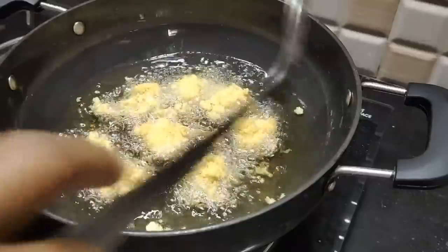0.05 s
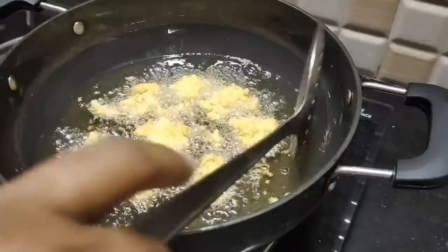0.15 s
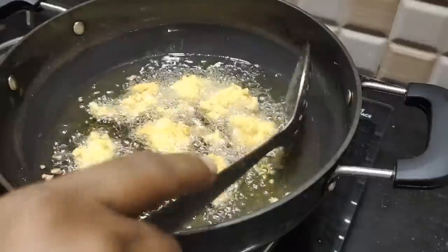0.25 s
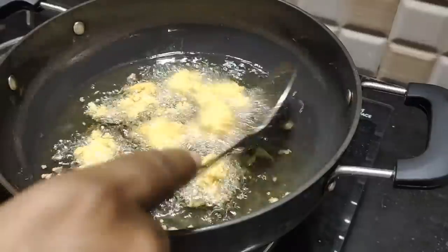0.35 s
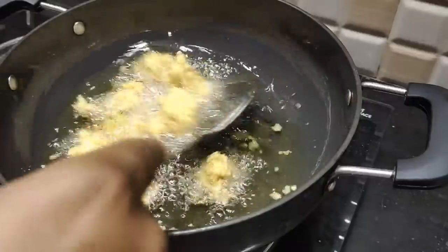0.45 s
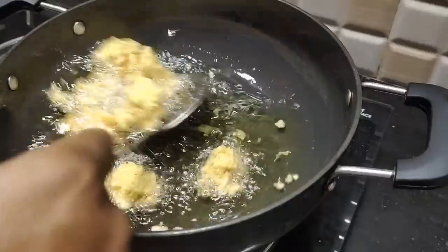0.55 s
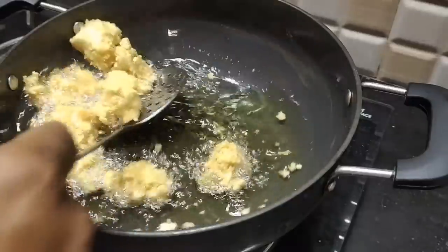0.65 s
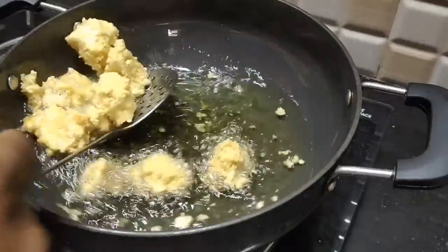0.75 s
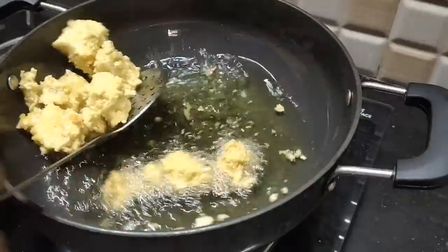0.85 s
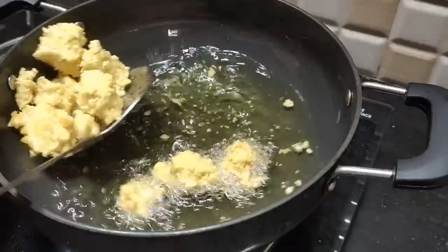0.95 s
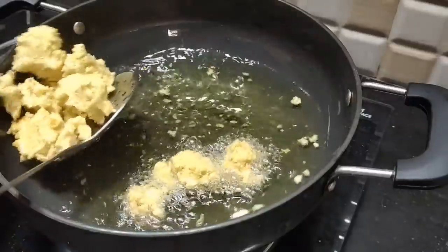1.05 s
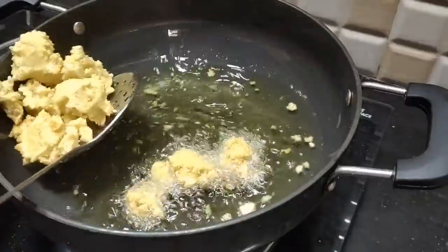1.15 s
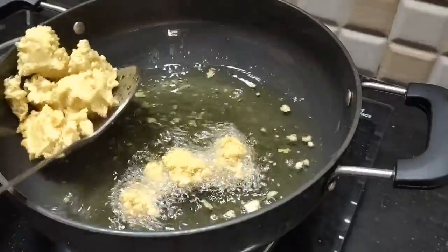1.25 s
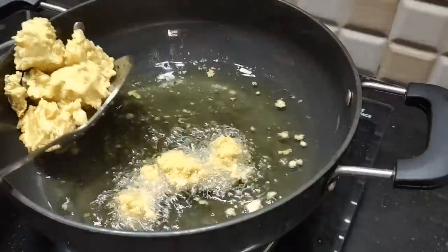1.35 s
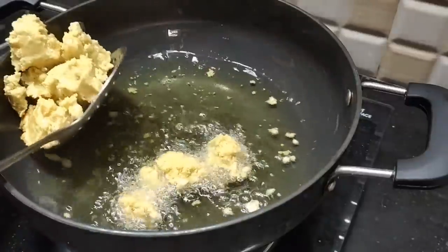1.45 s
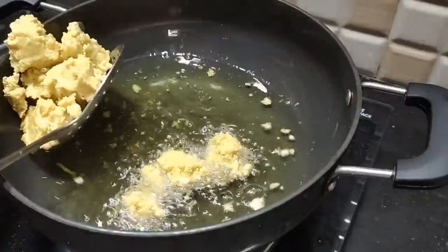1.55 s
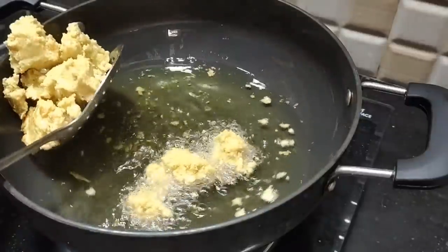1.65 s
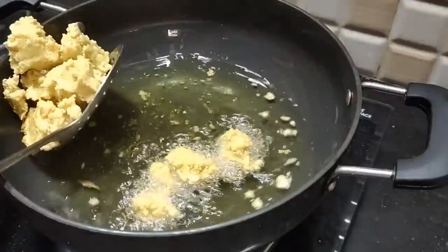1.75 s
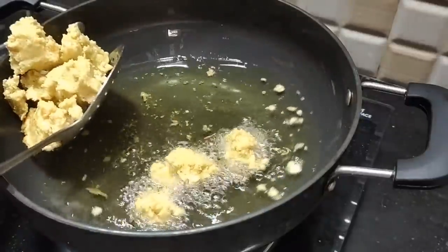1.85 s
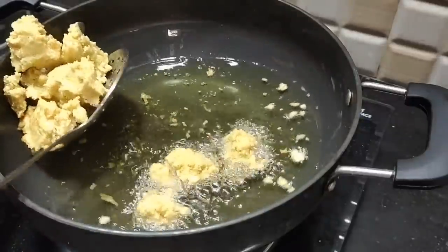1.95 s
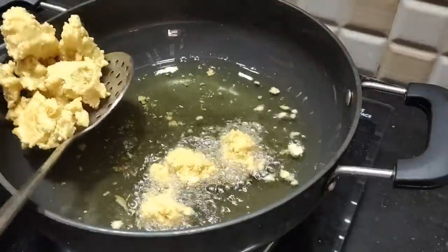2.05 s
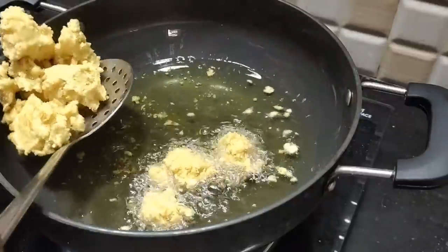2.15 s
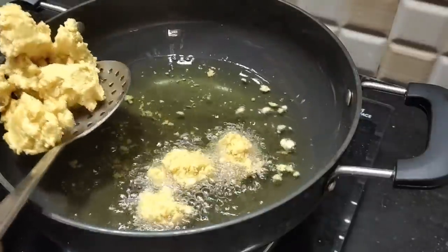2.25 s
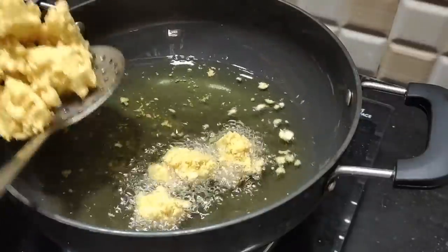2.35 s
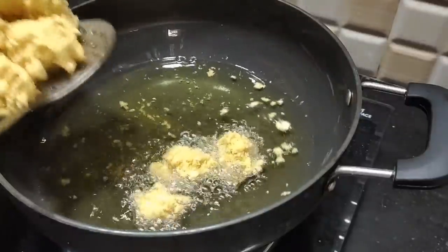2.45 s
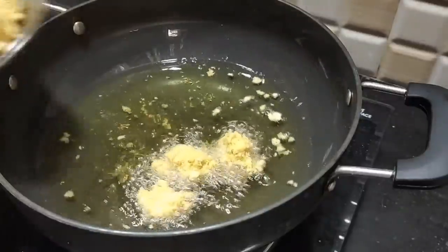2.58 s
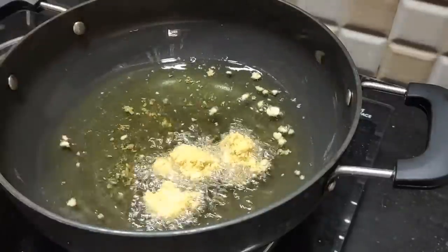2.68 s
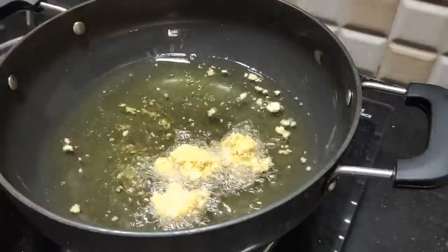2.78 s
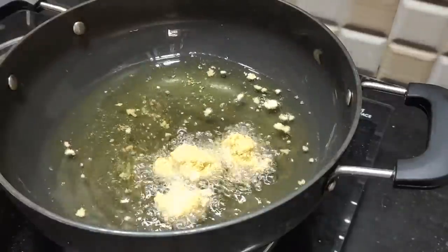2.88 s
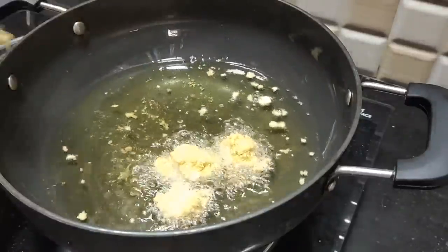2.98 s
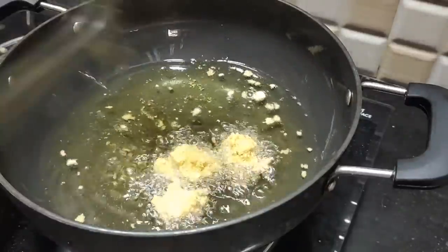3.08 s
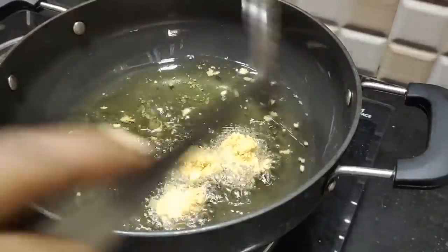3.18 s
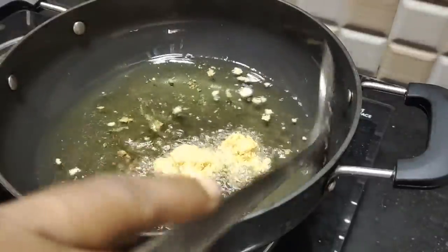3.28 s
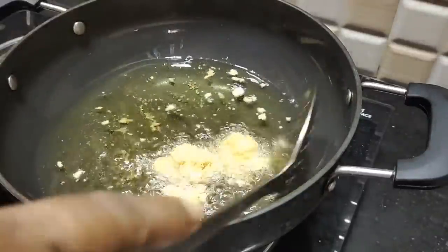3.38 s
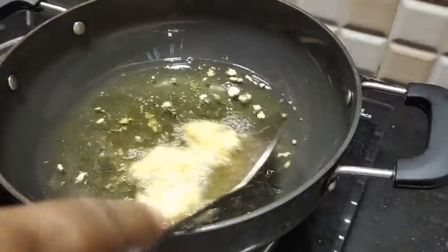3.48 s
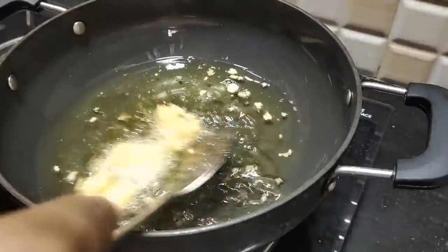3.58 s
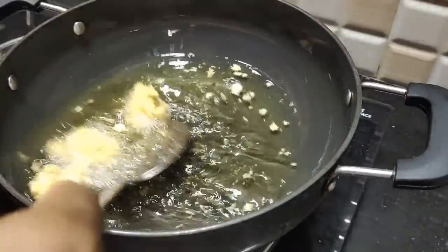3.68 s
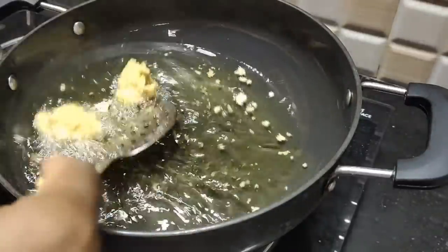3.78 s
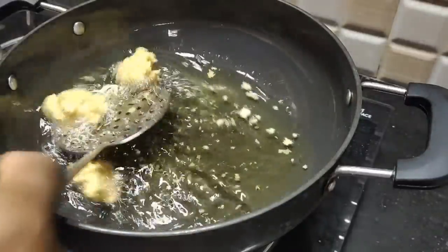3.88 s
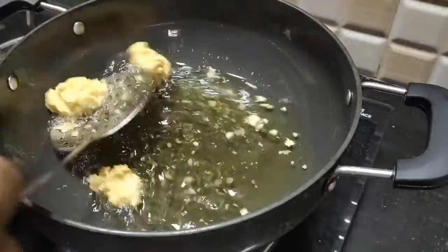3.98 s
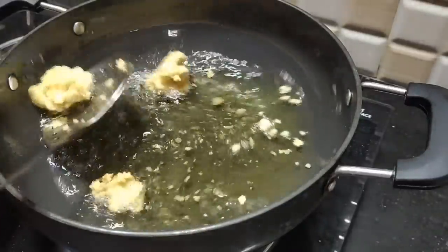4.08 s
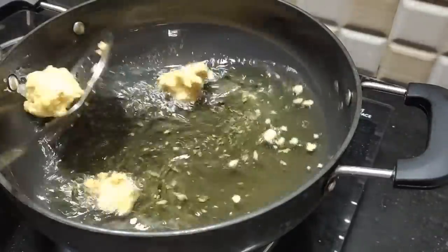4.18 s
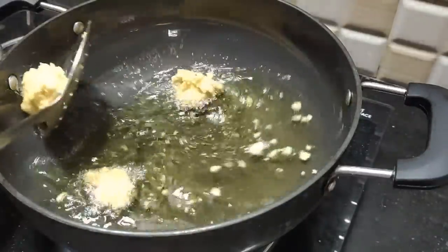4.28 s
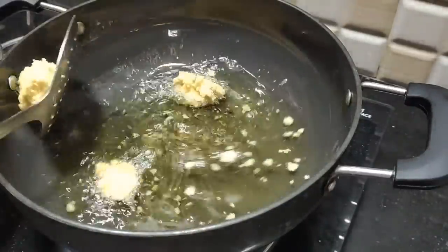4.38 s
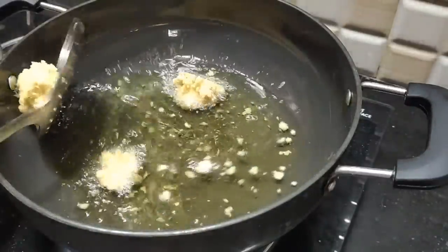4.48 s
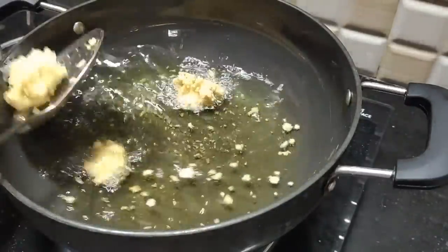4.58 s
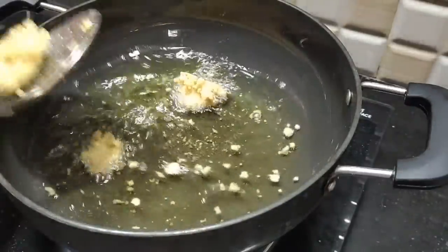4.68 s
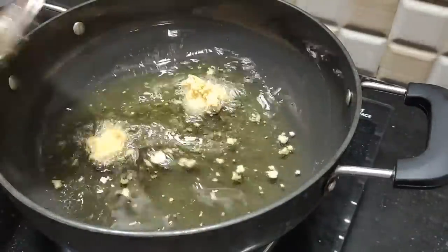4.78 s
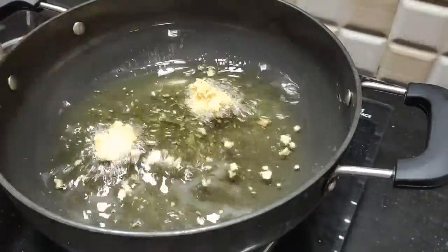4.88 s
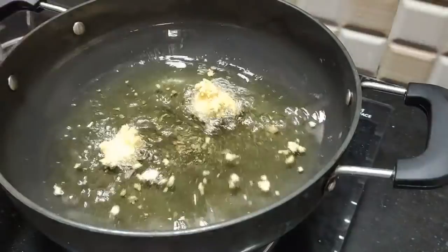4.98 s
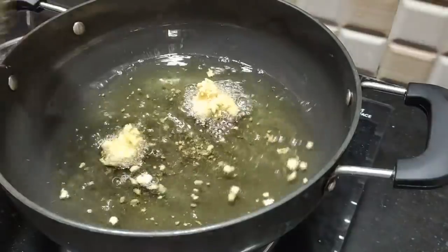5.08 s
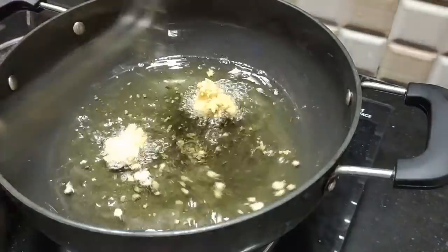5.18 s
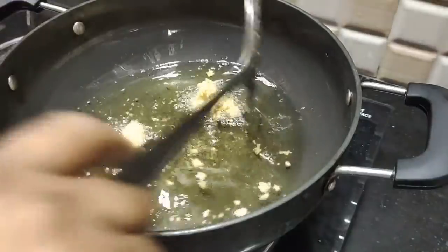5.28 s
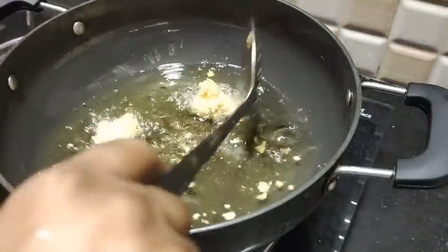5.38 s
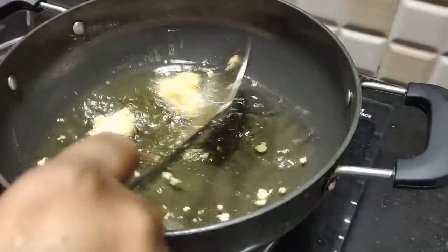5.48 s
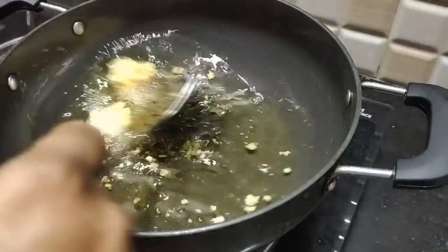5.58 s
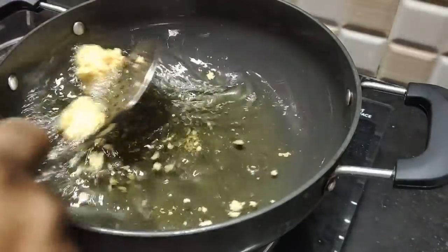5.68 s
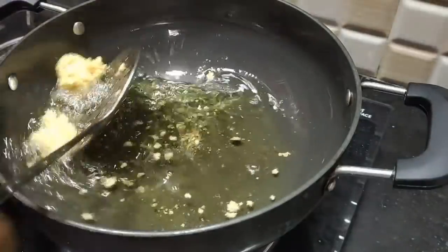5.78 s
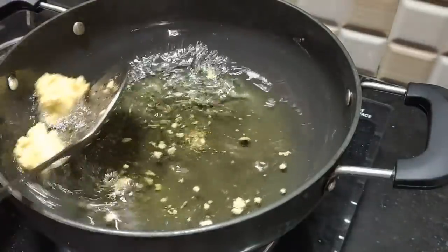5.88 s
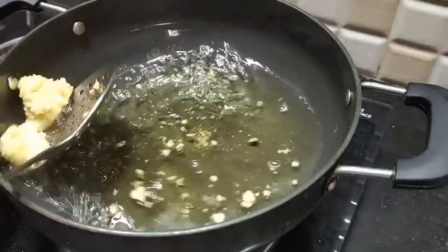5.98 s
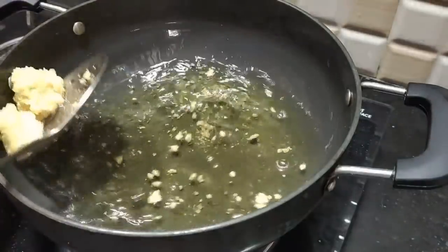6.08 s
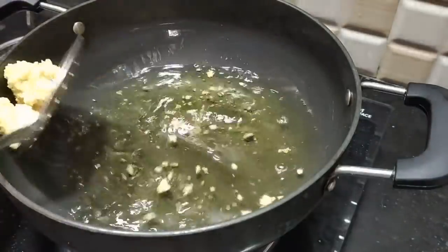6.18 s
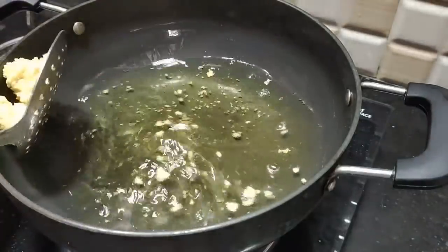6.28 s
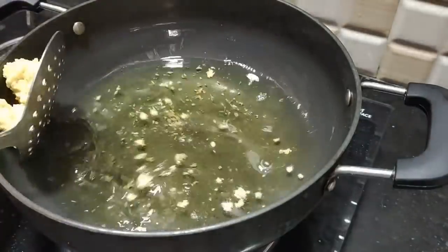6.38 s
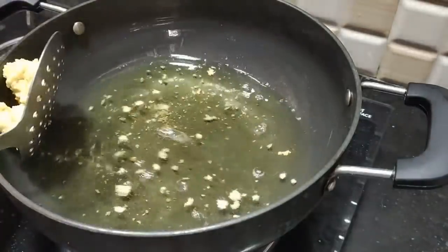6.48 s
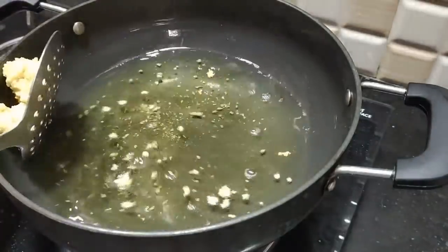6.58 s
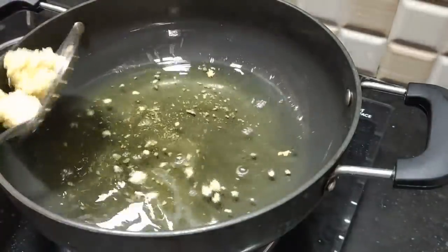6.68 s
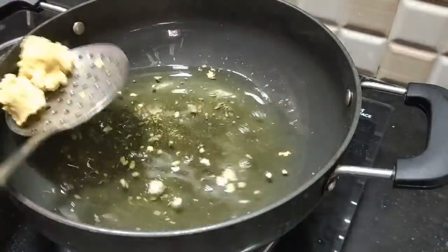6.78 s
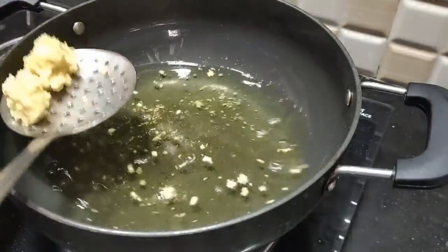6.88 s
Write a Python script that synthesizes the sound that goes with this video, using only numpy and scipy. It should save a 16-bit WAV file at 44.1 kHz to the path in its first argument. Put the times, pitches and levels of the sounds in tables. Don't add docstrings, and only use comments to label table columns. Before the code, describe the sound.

Intermittent metal spoon knocks and scrapes in an oil-filled pan, sharp clanks at a few moments, soft low thuds between, frying reduced to a faint hiss.

```python
import sys
import numpy as np
from scipy import signal
from scipy.fft import rfft, irfft
from scipy.io import wavfile
from scipy.ndimage import uniform_filter1d, minimum_filter1d

SR = 44100
rng = np.random.default_rng(int(sys.argv[2]) if len(sys.argv) > 2 else 0)


def boost_factor(decibels):
    exponent = np.asarray(decibels, float) / 20
    return 10 ** exponent


def to_wav(sig):
    pcm = np.clip(np.atleast_2d(sig), -1, 1) * 32767
    pcm = np.round(pcm).astype(np.int16)
    wavfile.write(sys.argv[1], SR, pcm.T)


N = 306054

# pitch in Hz, level in dB, time to fall 60 dB in s.
SPOON_TONES = [(3316, -22, .3), (3735, -13, .25), (4440, -21, .25), (5087, -9, .4), (6290, -24, .2),
               (6800, -17, .2), (7160, -4, .3), (7600, -11, .2), (7806, -16, .3), (8400, -11, .2),
               (8920, -14, .2), (10030, -13, .35), (10660, -14, .27), (12900, -15, .17)]
# pitch in Hz, level in dB, time to fall 60 dB in s.
WALL_TONES = [(667, -21, 5.0), (875, -16, 0.34), (1156, -14.5, 0.23), (1532, -21.5, 0.43),
              (1828, -13.5, 0.76), (2080, -48.5, 0.36), (2373, -60, 5.0), (2289, -18.5, 0.38),
              (2375, -26.5, 0.22), (2520, -21, 0.4), (2846, -9, 0.033), (3140, -31, 0.019)]
# pitch in Hz, level in dB, time to fall 60 dB in s.
RIM_TONES = [(1870, 16.5, 0.23), (2042, 0.5, 0.23), (2414, 7.5, 0.16), (2650, 3.5, 0.26)]
# pitch in Hz, level in dB, time to fall 60 dB in s.
BOWL_TONES = [(261, -6, 0.25), (273.2, -5.5, 0.38), (289.5, -1, 0.29), (320, 11, 0.23), (334, 4, 0.22),
              (515, -0.5, 0.11)]
# frequency in Hz, level in dB per Hz.
CRACK_COLOUR = [(180, -53), (300, -13.5), (737, -3.5), (1040, -10.5), (1930, -7.5), (3700, -14.5),
                (3950, -14.5), (7320, -6.5), (13100, -12), (16000, -30)]
# start in s, peak in dB, favoured pitch in Hz, push length in s.
PUSHES = [(0.045, -12.5, 299, 0.013), (0.056, -7.5, 273, 0.017), (0.109, -23, 275.6, 0.05),
          (0.234, -33, 300, 0.011), (0.589, -25.5, 320, 0.0076), (0.619, -22, 284, 0.021),
          (0.642, -19.5, 253, 0.035), (0.776, -38, 270, 0.037), (1.358, -49, 310, 0.014),
          (2.084, -41.5, 358, 0.035), (2.68, -28, 288, 0.056), (2.755, -33, 315, 0.0052),
          (2.809, -27, 288, 0.0054), (3.246, -28.5, 339, 0.029), (3.472, -31, 311, 0.054),
          (3.535, -27.5, 277.5, 0.019), (4.045, -42.5, 270, 0.034), (4.258, -24, 271, 0.021),
          (4.411, -42, 287.5, 0.051), (4.544, -26, 277, 0.026), (4.57, -22.5, 338, 0.021),
          (4.652, -34, 277, 0.025), (4.833, -32, 281.6, 0.035), (4.987, -36.5, 374, 0.008),
          (5.092, -42.5, 310, 0.0065), (5.171, -25.5, 274, 0.029), (5.225, -19, 280, 0.044),
          (5.656, -24.5, 267.5, 0.036), (5.765, -30.5, 266, 0.024), (5.877, -26.5, 272.6, 0.024),
          (5.914, -44.5, 274, 0.014), (6.244, -33, 289.3, 0.039), (6.697, -43.5, 320, 0.076)]


def evened(x):
    return x / np.sqrt(np.mean(x ** 2) + 1e-20)


def read(points, hz):
    f, value = np.transpose(points)
    return np.interp(np.log(hz + 1), np.log(f + 1), value)


def add(mix, s, sound):
    part = mix[..., round(s * SR):][..., :sound.shape[-1]]
    part += sound[..., :part.shape[-1]]


def coloured(x, spectrum):
    hz = np.fft.rfftfreq(x.shape[-1], 1 / SR)
    return evened(irfft(rfft(x) * boost_factor(read(spectrum, hz)), x.shape[-1]))


def sides(pan_db):
    return boost_factor(np.array([.5 * pan_db, -.5 * pan_db]))


def place(s):
    # time in s, left minus right in dB.
    path = [(0, 3.5), (1.1, 8.5), (1.6, 5), (2.5, 5), (3.6, 4), (4.2, 2), (4.55, 8), (4.62, 8), (4.7, 5),
            (5.2, 3), (6.94, 5.5)]
    return sides(np.interp(s, *np.transpose(path)))


def rings(modes, longest, length=.5):
    hz, db, t60 = np.transpose(modes)[:, :, None]
    t = np.arange(round(length * SR)) / SR
    return boost_factor(db - 60 * t / np.clip(t60, .02, longest)) * np.sin(2 * np.pi * hz * t)


def struck(ring, draw, spread_db):
    strength = boost_factor(spread_db * draw) * np.sign(draw[::-1, ::-1])
    sound = strength @ ring
    return sound / abs(sound).max()


def noise_burst(t, envelope, treble):
    burst = rng.standard_normal((2, len(t)))
    spot_db = 3.2 * evened(uniform_filter1d(rng.standard_normal(len(t) // 2 + 1), size=70))
    burst = irfft(rfft(burst + 0.13 * burst[::-1]) * boost_factor(spot_db), len(t))
    low = signal.lfilter(*signal.butter(4, 3300, fs=SR), coloured(burst, CRACK_COLOUR) * envelope)
    high = signal.lfilter(*signal.butter(3, 3500, "high", fs=SR), coloured(burst, treble) * envelope)
    return low / abs(low).max(), high / abs(high).max()


def patchy(x, depth_db):
    z = signal.stft(x, SR, nperseg=512)[2]
    patches = uniform_filter1d(rng.standard_normal(z.shape[1:]), size=3, axis=0)
    patches = evened(uniform_filter1d(patches, size=22, axis=1))
    return evened(signal.istft(z * boost_factor(depth_db * patches), SR, nperseg=512)[1][:, :N])


def bowl_only(x):
    return signal.sosfilt(signal.butter(2, 215, "high", fs=SR, output="sos"), x)


def knocks():
    # start in s, peak in dB, wall share in dB,
    # loudest low line in Hz, loudest high line in Hz.
    blows = [(2.0888, -34, 2, 5080, 7240), (2.25, -42.5, 6.5, 2650, 6950), (2.3045, -33, 7, 2160, 7840),
             (2.3898, -38, -2, 1870, 7840), (2.6909, -13.5, -24, 4600, 8750), (2.826, -31, -3, 2880, 7230),
             (2.8568, -31, -25, 2730, 9280), (3.021, -34.5, -2, 2200, 7100), (3.105, -38, 1.5, 1890, 6780),
             (3.2175, -45, -6.5, 3600, 7850), (3.242, -14, -17, 5080, 7154), (3.255, -9, -23, 5087, 7154),
             (4.567, -8, -14, 2011, 6950), (4.575, -11.5, -17.5, 1870, 8366), (4.6338, -6, -11, 1873, 7622),
             (4.652, -22, -5.5, 2650, 8924), (4.9819, -41.5, 5, 4540, 8040),
             (6.7152, -20, -10.5, 5070, 7160), (6.723, -22.5, -5, 1930, 8300),
             (3.127, -36, -12, 2330, 7500)]
    grip_t60_s = 0.091
    wall, spoon = rings(WALL_TONES + RIM_TONES, 0.53), rings(SPOON_TONES, 0.91)
    coated = rings(np.multiply(SPOON_TONES, [.9935, 1, 1]), 0.91)
    out = np.zeros((2, N))
    t = np.arange(wall.shape[1]) / SR
    gaps = abs(np.diff([row[0] for row in blows], append=10))
    for (s, db, wall_db, low_hz, high_hz), gap in zip(blows, gaps):
        draw = rng.standard_normal((2, 60))
        crack_fall = boost_factor(-60 * t / 0.024) + boost_factor(-4.0 - 60 * t / 0.092)
        low, high = noise_burst(t, crack_fall, CRACK_COLOUR)
        choke = 0.66 * boost_factor(-60 * t / grip_t60_s - 3200 * np.maximum(t - gap, 0))
        clank = 1.07 * low + 1.73 * choke * boost_factor(-300 * t) * struck(wall, draw[:, -len(wall):], 7.2)
        high_line = boost_factor(-250 * t) * 0.61 * np.sin(2 * np.pi * high_hz * t)
        low_line = .5 * boost_factor(0.57 * wall_db - 960 * t) * np.sin(2 * np.pi * low_hz * t)
        is_coated = 4.5 < s < 5.5
        ring = struck(coated if is_coated else spoon, draw[:, :len(spoon)], 3.5)
        chink = 0.9 * high + choke * (0.83 * ring + high_line + low_line)
        blow = (boost_factor(wall_db) * clank + chink) * np.minimum(t / 0.0017, 1)
        add(out, s, boost_factor(db + 1.5) * place(s)[:, None] * blow)
    return out


def slaps():
    # start in s, peak in dB, crack fall time (60 dB) in s,
    # rattle level in dB, rattle fall time (60 dB) in s.
    flat_hits = [
        (0.228, -16, 0.053, -9, 0.35),
        (2.691, -14.5, 0.024, -3.5, 0.42),
        (5.3367, -1, 0.012, -7, 0.19),
        (3.243, -21, 0.082, -9.5, 0.3),
        (4.567, -13, 0.055, -8.5, 0.19),
        (4.633, -18, 0.06, -12.5, 0.19),
        (6.714, -25, 0.06, -16, 0.25),
        (2.672, -30, 0.3, -10, 0.2),
    ]
    # frequency in Hz, level in dB per Hz.
    slap_colour = [(240, -21.5), (400, -7), (2060, -9.5), (2320, -1), (3970, -17.5), (7100, -13.5),
                   (11000, -13), (15500, -26.5)]
    t, out = np.arange(SR // 2) / SR, np.zeros((2, N))
    for s, db, crack_t60, rattle_db, rattle_t60 in flat_hits:
        burst = rng.standard_normal((2, len(t)))
        noise = coloured(burst + .5 * burst[::-1], slap_colour)
        crack = boost_factor(-60 * np.maximum(t - .004, 0) / crack_t60)
        rattle = boost_factor(rattle_db - 60 * t / rattle_t60)
        rise = np.minimum(t / 0.0013, 1)
        add(out, s, boost_factor(db - 13.5) * place(s)[:, None] * noise * (crack + rattle) * rise)
    return out


def thumps():
    ring, out = rings(BOWL_TONES, 1.2, length=0.67), np.zeros(N)
    for s, db, hz, length in PUSHES:
        near = boost_factor(-((np.transpose(BOWL_TONES)[0] - hz) / 14) ** 2 + 18.0)
        samples = max(round(length * SR), 8)
        push = np.hanning(samples) * np.sin(2 * np.pi * hz * np.arange(samples) / SR)
        boom = signal.oaconvolve((near + 0.05) @ ring, push)
        add(out, max(s - .006, 0), boost_factor(db - 2.0) * boom / abs(boom).max())
    return out * sides(1.7)[:, None]


def bumps():
    # start in s, peak in dB, treble share in dB, time to fall 60 dB in s.
    dull_hits = [(0.039, -26.5, -8.5, 0.21), (0.056, -30, -3, 0.32), (0.234, -28, -11, 0.094),
                 (0.58, -35, -14, 0.36), (0.618, -27.5, -12.5, 0.15), (0.653, -28, -9.5, 0.071),
                 (0.699, -30, -14, 0.13), (1.338, -38.5, -19.5, 0.12), (1.885, -46.5, -33, 0.17),
                 (1.929, -37.5, -27, 0.06), (2.336, -31.5, -16, 0.11), (2.686, -21.5, -7, 0.27),
                 (2.789, -26, -8.5, 0.3), (3.128, -34, -11, 0.036), (3.309, -34, -9.5, 0.49),
                 (3.462, -22.5, -20.5, 0.45), (3.509, -23, -16, 0.057), (3.59, -32, -8.5, 0.066),
                 (4.042, -46.5, -26, 0.1), (4.213, -40, -21, 0.055), (4.402, -39.5, -40, 0.46),
                 (4.837, -41, -15, 0.2), (5.178, -33.5, -22, 0.16), (5.238, -38.5, -14.5, 0.14),
                 (5.648, -33, -18, 0.53), (5.89, -39.5, -22, 0.086), (6.327, -37.5, -53, 0.051),
                 (6.383, -32, -22.5, 0.48), (6.559, -33, -41, 0.43)]
    # frequency in Hz, level in dB per Hz.
    bump_treble = [(2350, -15.5), (4000, -14), (6000, -13), (7480, -5.5), (10700, -30), (11800, -24),
                   (15500, -37.5), (16000, -52.5)]
    rise_s = .007
    wall, out = rings(WALL_TONES, 0.071, length=0.016), np.zeros((2, N))
    t = np.arange(SR // 2) / SR
    for s, db, treble_db, t60 in dull_hits:
        draw = rng.standard_normal((2, 30))
        swell = (1 - np.exp(-(t / rise_s) ** 2)) * boost_factor(-60 * t / max(t60, .02))
        low, high = noise_burst(t, swell, bump_treble)
        body = struck(wall, draw[:, :len(wall)], 7.6)
        rung = signal.oaconvolve(low, body, axes=1)[:, :len(t)]
        thud = .5 * low + 0.41 * rung / abs(rung).max() + boost_factor(treble_db + 5.5) * high
        add(out, max(s - .5 * rise_s, 0), boost_factor(db + 3.5) * place(s)[:, None] * thud)
    return out


def pressure(layer):
    # start in s, length in s, pressure as wall level in dB,
    # bowl share in dB, fizz share in dB.
    strokes = [(0.051, 0.036, -35.5, 7, -14.5), (0.565, 0.11, -55.5, 8.5, -23), (0.6, 0.14, -58, -13, -2),
               (0.06, 0.08, -60, -13, 11), (0.7, 0.17, -58, -13, -11), (0.938, 0.085, -59.5, 4.5, -10.5),
               (1.896, 0.23, -51, -8, -14), (2.252, 0.044, -50, -5, -6), (2.683, 0.015, -53, 0, 6.5),
               (2.696, 0.18, -40.5, -12, -8), (2.94, 0.16, -48, -18, -27), (3.258, 0.14, -46.5, -3, 3.5),
               (3.479, 0.057, -41.5, -11, 3), (3.727, 0.34, -85.5, 24, 0.5), (4.013, 0.24, -75, 14.5, 21),
               (4.21, 0.1, -59, 5, 0), (4.7, 0.32, -61, 5, 0), (4.3, 0.3, -72, 16, 8),
               (4.553, 0.014, -40, 2, -10), (4.815, 0.1, -45, -17, -17), (4.988, 0.18, -56.5, -31, 1),
               (5.203, 0.052, -45.5, 8, -10), (5.345, 0.13, -44, -8, 2.5), (5.664, 0.19, -46.5, -7, -31),
               (5.873, 0.15, -47.5, -2, -18), (6.165, 0.13, -84, 27, 22), (6.345, 0.17, -52.5, 0, -23),
               (6.564, 0.092, -61, -2, 1.5), (4.468, 0.092, -58, -12, 7.5),
               (6.794, 0.17, -81.5, 22.5, 15.5)]
    press_db_per_s, lift_db_per_s = 495, (84, 110, 173)[layer]
    t = np.arange(0, N, 64) / SR
    s, length, db, bowl_db, fizz_db = np.transpose(strokes)[:, :, None]
    press_db = -press_db_per_s * np.maximum(s - t, 0)
    lift_db = -lift_db_per_s * np.maximum(t - s - length, 0)
    share_db = (bowl_db, 0, fizz_db)[layer]
    gain = np.sqrt((boost_factor(db + share_db + press_db + lift_db) ** 2).sum(0))
    return np.interp(np.arange(N) / SR, t, gain)


def rubbing():
    # frequency in Hz, level in dB per Hz.
    wall_colour = [(220, -42), (380, 4), (750, 8), (1630, -1), (1800, -0.5), (2110, -16.5), (2240, 7.5),
                   (2950, -10), (3320, -5), (4000, -13), (5200, -30.5), (8800, -120)]
    # frequency in Hz, level in dB per Hz.
    fizz_colour = [(2060, -59.5), (3500, -23), (3920, -12.5), (5780, 8), (7600, 14), (8580, 16.5),
                   (8910, 10), (11300, 10), (12600, -2), (14400, 1.5), (16000, -18.5)]
    clumps = boost_factor(2.4 * evened(uniform_filter1d(rng.standard_normal(N), 400)))
    sizes = boost_factor(1.7 * np.minimum(rng.exponential(1, (2, N)), 4))
    slips = clumps * sizes * np.sign(rng.random((2, N)) - .5) * (rng.random((2, N)) < .2)
    slips = evened(slips + .5 * slips[::-1])

    def through(modes, longest):
        ring = rings(modes, longest).sum(0)[None]
        return evened(signal.oaconvolve(slips, ring, axes=1)[:, :N])

    bowl = bowl_only(through(BOWL_TONES, .6).mean(0)) * sides(-0.34)[:, None]
    wall = patchy(coloured(slips, wall_colour) + .4 * through(WALL_TONES, .3), 3)
    wall = wall + boost_factor(-12) * through(RIM_TONES, .3)
    fizz = patchy(coloured(slips, fizz_colour) + 0.6 * through(SPOON_TONES[5:], 0.08), 4)
    at_spoon = pressure(layer=1) * wall + boost_factor(0.5) * pressure(layer=2) * fizz
    return pressure(layer=0) * bowl + place(np.arange(N) / SR) * at_spoon


def singing():
    # start in s, level in dB,
    # pitch in Hz, width in Hz, time to fall 60 dB in s.
    resonances = [(0.227, -34.5, 2665, 337, 0.41), (0.601, -42.5, 2960, 396, 1),
                  (2.39, -35, 1977, 30, 0.32), (2.723, -32.5, 1870, 39.6, 0.33),
                  (3.243, -33, 5085, 40, .45), (4.407, -40.5, 1870, 68.8, 0.52),
                  (6.721, -37, 1970, 40.4, 0.34), (1.882, -47, 2306, 296, 0.82),
                  (4.634, -33, 2650, 313, 0.32), (5.338, -15, 2390, 300, 0.065),
                  (5.339, -30, 7080, 199, 0.41), (3.244, -39, 3746, 35, 0.24),
                  (3.244, -45, 4463, 30, .25), (3.256, -25, 7163, 45, 0.16),
                  (3.255, -39, 10035, 30, .35), (3.255, -44, 10660, 30, .27),
                  (3.255, -37, 12990, 40, 0.22), (4.566, -10, 7116, 30, .16), (4.567, -34, 3725, 25, .3),
                  (4.568, -35, 5050, 30, 0.34), (4.572, -32, 12620, 60, .14),
                  (4.634, -33, 7600, 60, 0.14), (6.716, -34, 7160, 25, 0.38),
                  (6.716, -44, 5087, 25, 0.4), (6.716, -50, 4382, 30, .3), (6.716, -45, 5809, 40, .1),
                  (2.09, -50, 5090, 30, 0.32), (2.09, -47, 7160, 30, 0.34), (1.89, -48, 800, 119, 0.86),
                  (1.901, -47, 1900, 80, .5), (6.575, -58, 12850, 200, 0.7),
                  (5.679, -50, 2900, 497, 0.85), (6.4, -46, 2600, 400, 0.54),
                  (0.62, -48, 1770, 50, 0.71), (3.469, -38, 1950, 80, 0.59), (1.8, -66, 2400, 60, 2),
                  (2.305, -46, 7530, 60, .5), (3.27, -43, 11500, 3500, .6), (0.06, -46, 5200, 2500, .4),
                  (0.63, -50, 4800, 2500, .45),
                  (0.645, -46, 2950, 90, .4), (1.337, -58, 2600, 300, .4), (1.337, -53, 1950, 50, .5),
                  (1.93, -58, 7300, 40, .4), (1.89, -52, 2400, 70, .7), (2.305, -40, 1870, 90, .2),
                  (2.39, -48, 3600, 200, .12), (2.49, -52, 1970, 40, .4), (3.045, -48, 7000, 500, .3),
                  (3.245, -38, 520, 140, .2), (4.045, -55, 2400, 100, .3), (4.045, -55, 1850, 80, .3),
                  (4.12, -59, 5500, 100, .6), (4.21, -50, 1900, 80, .4), (4.566, -25, 715, 60, .15),
                  (4.634, -34, 4250, 300, .15), (5.655, -50, 4250, 500, .4), (5.77, -59, 4900, 90, .9),
                  (5.87, -50, 6900, 100, .25), (5.94, -58, 7900, 120, .4), (6.16, -56, 8500, 90, 1.5),
                  (6.25, -58, 3450, 150, .5), (6.39, -52, 1950, 70, .6), (6.39, -54, 2400, 70, .6),
                  (0.6, -49, 7500, 1300, .6), (0.655, -47, 7400, 1300, .5), (5.3368, -19, 720, 400, .035),
                  (2.701, -30, 7600, 2000, .06), (2.714, -33, 7000, 1500, .06), (2.092, -50, 1840, 40, .5),
                  (3.126, -48, 7480, 90, .6), (4.565, -24, 2050, 300, .08), (6.716, -38, 2350, 250, .15),
                  (6.559, -44, 2600, 1800, .06), (2.385, -46, 7600, 2500, .15), (0.06, -46, 3750, 200, .3),
                  (4.8, -51, 2800, 1400, .9), (5.225, -52, 3800, 120, .6), (2.72, -41, 12000, 3500, .8),
                  (1.338, -58, 4800, 80, .4)]
    steady_hz, sag_per_s = 50, 1
    t, out = np.arange(SR // 2) / SR, np.zeros((2, N))
    for s, db, hz, width, t60 in resonances:
        wander = rng.standard_normal((2, 2, len(t)))
        slow = evened(signal.lfilter(*signal.butter(2, .5 * width, fs=SR), wander)) + steady_hz / width
        turn = np.exp(2j * np.pi * np.cumsum(hz - sag_per_s * width * t) / SR)
        tone = evened(((slow[0] + 1j * slow[1]) * turn).real)
        fade = boost_factor(db - 60 * t / t60) * np.minimum(t / 0.0037, 1)
        add(out, s, fade * place(s)[:, None] * tone)
    return out


def shudder():
    t, force = np.arange(SR // 2) / SR, np.zeros(N)
    for s, db, _, _ in PUSHES:
        add(force, s, boost_factor(db - 43 - 60 * t / 0.68) * np.minimum(t / 0.016, 1))
    rumble = signal.lfilter(*signal.butter(1, [70, 160], "band", fs=SR), rng.standard_normal(N))
    return force * evened(rumble)


def sizzle():
    # frequency in Hz, level in dB per Hz.
    hiss_colour = [(18, -47), (30, -41.5), (98, 4.5), (215, -32), (280, -6.5), (684, -0.5), (1010, -13.5),
                   (2120, -4.5), (3870, -11), (8080, 2.5), (10800, -4.5), (14000, -1.5), (16000, -10)]
    hiss_db, hum_db, hum_hz = -71.5, -90.5, 95
    waver = evened(uniform_filter1d(rng.standard_normal(N), 3000))
    hum_phase = 2 * np.pi * hum_hz * np.arange(N) / SR + 0.53 * waver[::-1]
    hum = boost_factor(hum_db - 4.5 + 4.0 * waver) * np.sin(hum_phase)
    pop_sizes = boost_factor(4.0 * np.minimum(rng.exponential(1, (2, N)), 4))
    pops = pop_sizes * (rng.random((2, N)) < .03) * rng.standard_normal((2, N))
    frying = coloured(rng.standard_normal((2, N)) + .6 * evened(pops), hiss_colour)
    return boost_factor(hiss_db + 3.0) * patchy(frying, 2.6) + hum


def kitchen(x):
    # frequency in Hz, time to fall 60 dB in s.
    room_fade = [(100, 0.25), (300, 0.56), (1700, 0.43), (4600, 0.39), (12000, 0.28)]
    taps = np.zeros((2, SR))
    at = np.arange(200, SR - 20, 20) + rng.integers(0, 20, (2, (SR - 201) // 20))
    np.put_along_axis(taps, at, rng.choice([-1., 1.], at.shape), 1)
    hz, t, z = signal.stft(taps, SR, nperseg=256)
    fade = boost_factor(-60 * t / read(room_fade, hz)[:, None] - 50 * t ** 2)
    tail = signal.istft(z * fade, SR, nperseg=256)[1]
    return signal.fftconvolve(x, tail / np.linalg.norm(tail[0]), axes=1)[:, :N]


def scene():
    hits = knocks() + bumps()
    booms = bowl_only(thumps())
    flat = slaps()
    boom_echo = kitchen(booms)
    mix = hits + flat + boost_factor(-2.5) * kitchen(hits + boost_factor(-6.5) * flat)
    mix = mix + booms + boost_factor(-17.0) * (boom_echo + 2.3 * boom_echo.mean(0))
    return mix + rubbing() + sizzle() + singing() + shudder()


def masked(x, under_db, range_db, top_hz):
    start = 286
    hz, t, z = signal.stft(x[:, start:], SR, nperseg=2048)
    power = (abs(z[:, :1024]) ** 2).mean(0).reshape(128, 8, -1).mean(1)
    level_db = 10 * np.log10(power + 1e-20)
    around_db = uniform_filter1d(level_db, 21, 0, mode="nearest")
    low = level_db < around_db - under_db
    dip = low & (level_db <= minimum_filter1d(level_db, 3, 0))
    dip = dip | low & np.roll(dip, 1, axis=0)
    in_range = level_db > level_db.max(0) - range_db
    keep = ~dip & in_range | (np.arange(128)[:, None] < 13)
    gain = np.vstack([np.repeat(np.where(keep, 1, .02), 8, 0), 0 * t]) * (hz[:, None] < top_hz)

    def back(g):
        return np.hstack([.5 * x[:, :start], signal.istft(z * g, SR, nperseg=2048)[1]])[:, :N]

    top = back(((hz >= top_hz) & (hz < 16400))[:, None])
    treble = uniform_filter1d((np.diff(x, prepend=0) ** 2).sum(0), 200)
    attack = uniform_filter1d(1. * (treble > 60 * np.roll(treble, 500)), 200)
    return back(gain) + attack * top


def roll_off(x):
    return signal.sosfilt(signal.butter(12, 16630, fs=SR, output="sos"), x)


def record(dry):
    # frequency in Hz, left minus right in dB.
    port_balance = [(60, 1.5), (130, -0.5), (290, -2.5), (640, -2.5), (1410, -1.5), (3100, -2),
                    (6820, -0.5), (15000, 0)]
    left_lag_s = 0.0002405
    hz = np.fft.rfftfreq(N, 1 / SR)
    lag = left_lag_s * hz / (1 + (500 / (hz + 1)) ** 2)
    turn = np.exp(-1j * np.pi * np.outer([1, -1], lag))
    bass_cut = 1 / np.sqrt(1 + (90 / (hz + 1)) ** 4)
    ports = irfft(rfft(dry) * sides(2.18 * read(port_balance, hz)) * turn * bass_cut, N)
    ports = .85 * np.tanh(ports / .85)
    return roll_off(masked(ports, under_db=2.5, range_db=47, top_hz=15250))


dry = scene()
out = record(dry)
to_wav(out)
```